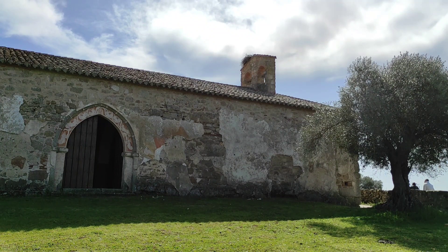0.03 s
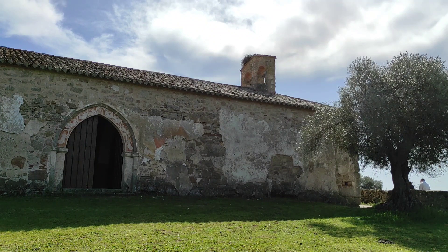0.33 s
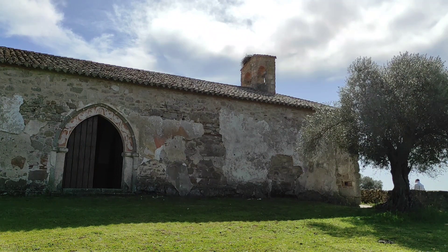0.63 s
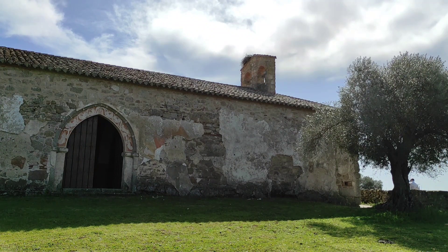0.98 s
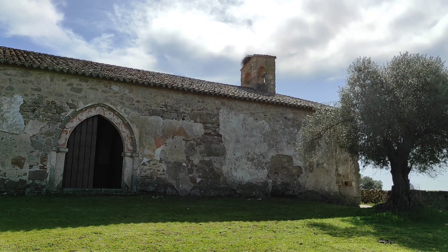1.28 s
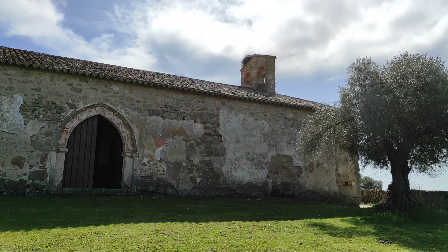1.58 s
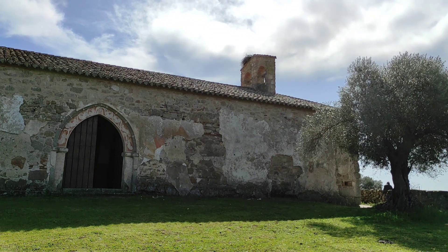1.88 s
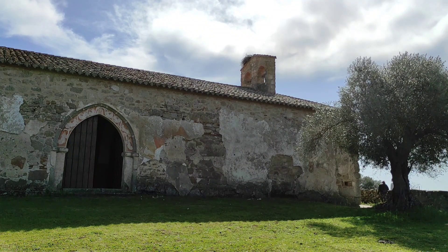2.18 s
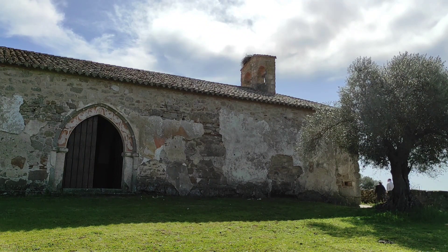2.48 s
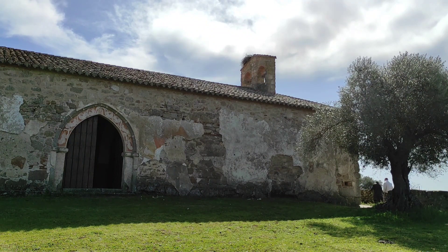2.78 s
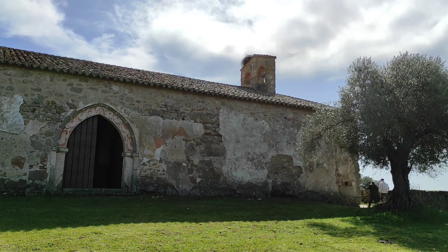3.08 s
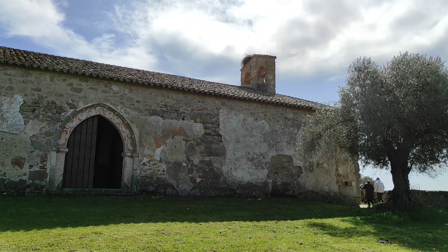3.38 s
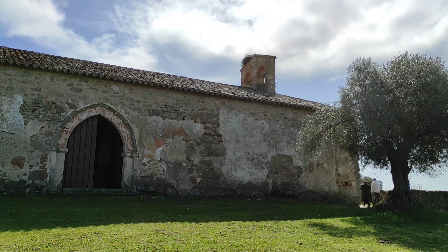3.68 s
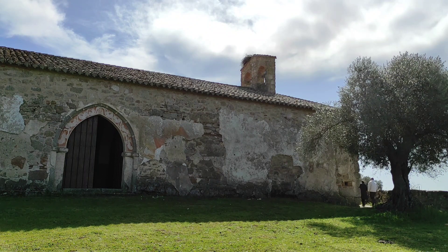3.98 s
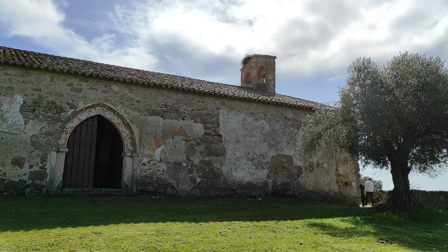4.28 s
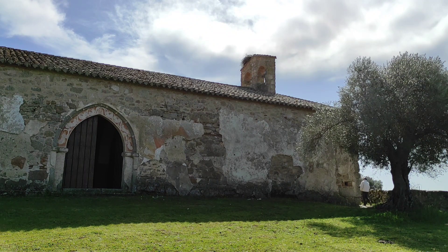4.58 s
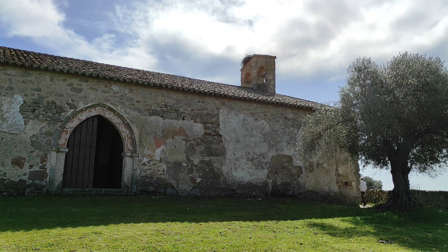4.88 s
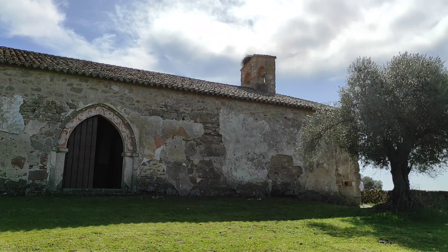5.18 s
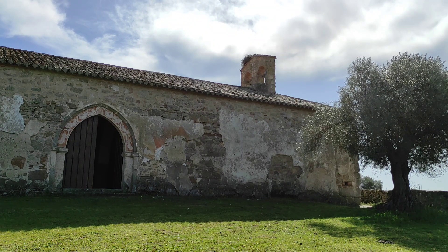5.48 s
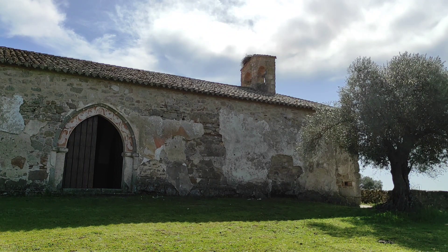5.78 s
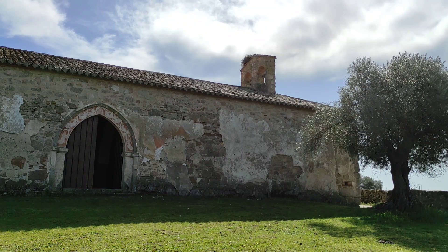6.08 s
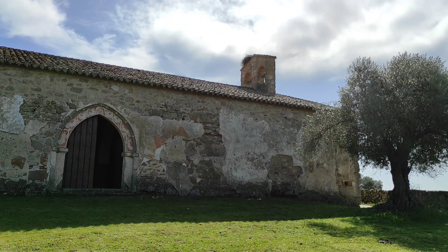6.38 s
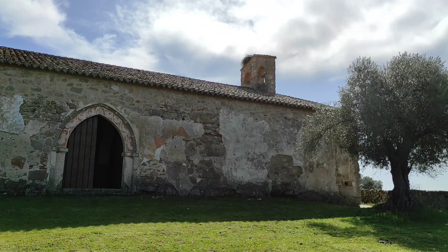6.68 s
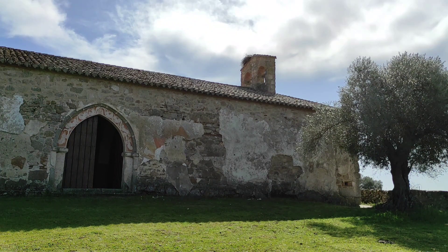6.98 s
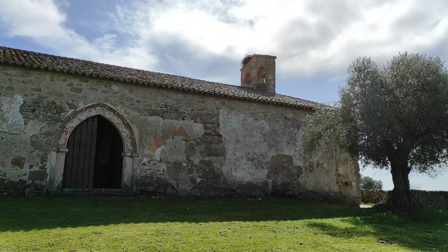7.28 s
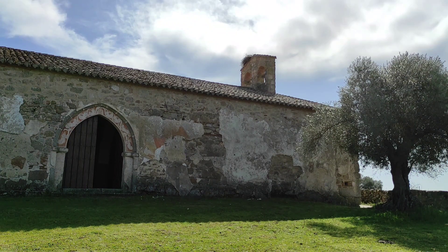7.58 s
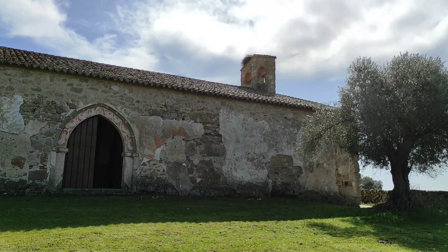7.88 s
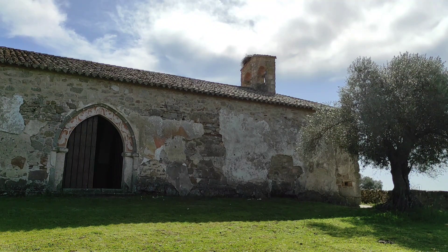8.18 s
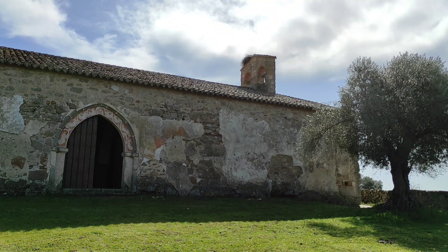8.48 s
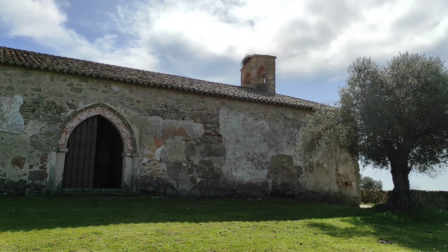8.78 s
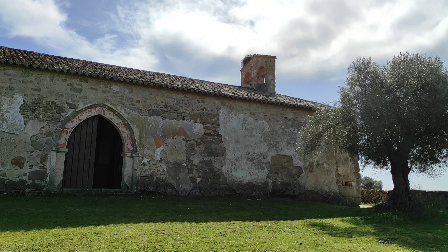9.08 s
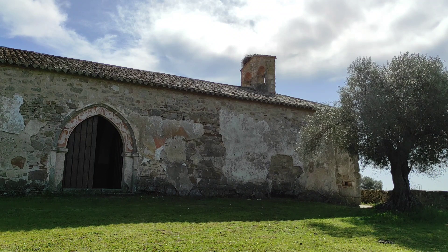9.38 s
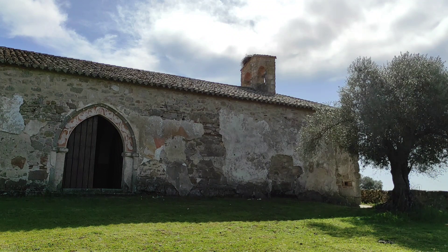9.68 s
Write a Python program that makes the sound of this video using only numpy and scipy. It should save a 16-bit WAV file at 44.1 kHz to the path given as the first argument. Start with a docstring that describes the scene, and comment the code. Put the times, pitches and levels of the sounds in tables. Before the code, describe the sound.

Outdoors in the countryside, one small bell is turned over and over by hand, clanging about three times a second in soft and hard pairs whose tones ring into each other. Stone walls answer briefly and the axle groans faintly. Wind buffets the microphone at first and then settles to a low rumble with a gentle hiss of leaves. Late on, a distant cow gives one faint low while the bell keeps ringing.

```python
"""A small bronze bell in a stone gable, turned over and over by hand, is already pealing as heard from the lawn.
Its clapper falls twice a turn, softly on one lip, then hard and bright on the other, exciting modes that
decay in a fast even peal; the axle groans faintly around each soft blow and the walls answer.
Wind buffets the microphone, with sharp puffs in the first 2.3 s, then eases over a wash of air and leaves.
From 8.4 s a cow lows far away while the bell rings on."""
import sys
import numpy as np
from scipy import signal
from scipy.fft import rfft, irfft, next_fast_len
from scipy.io import wavfile
from scipy.ndimage import map_coordinates

SR = 44100
rng = np.random.default_rng(int(sys.argv[2]) if len(sys.argv) > 2 else 0)


def pcm_store(signal):
    """Save signal as 16-bit PCM."""
    levels = np.round(np.clip(np.atleast_2d(signal), -1, 1) * 32767)
    wavfile.write(sys.argv[1], SR, levels.astype(np.int16).T)


N = 433944

# Clapper blows, soft lip and hard lip in turn; the hum gains or loses by how a blow meets the
# old ringing: (time [s], force [dB], hum gain [dB])
BLOWS = [(-0.17, 0, -1), (0.1225, -0.5, -3.5), (0.549, 2.5, -2), (0.8838, 1, -1.5), (1.2983, -2.5, -9),
         (1.623, 1.5, -.5), (2.027, 0, -4), (2.3171, -0.8, -6.5), (2.7422, 1, -4.5), (3.0359, -1, -6.5),
         (3.4435, 1.5, -2.6), (3.7586, 1, -5), (4.1756, 0.9, -3.5), (4.476, 0.2, -1.5), (4.8939, 1, -4.5),
         (5.1845, -2.5, -4), (5.6167, -0.3, -2), (5.9063, -2.3, -6.5), (6.3196, 0.9, -9.5),
         (6.64, -2.1, -1.5), (7.079, 0.5, -1), (7.3673, 0.4, -4), (7.787, -0.1, -3.5), (8.0688, -3, -3),
         (8.4794, 3.5, 1), (8.8003, 1, 6.5), (9.2082, -4.5, 6), (9.5045, -1.4, 0.5)]
BLOW_TIMES = [row[0] for row in BLOWS] + [9.93]  # the last entry is the next soft blow: it closes the final turn, and the axle groans just before it


def bell(hum_hz=977.2, hard_clang_db=-39.5, soft_clang_db=-45.0, clang_t60=0.31,
         crack_db=8, crack_t60=0.064, rebound_db=-2.0, rebound_rise_s=.012, rebound_t60=0.096,
         hard_rise_s=0.0002, soft_rise_s=0.0017, damp_s=0.005):
    """Impact excitation: each blow damps the old ringing and starts new modes, a crack and a clang."""
    # A stronger blow is brighter: (frequency [Hz], gain at 0 dB force [dB], growth with force [dB/dB])
    brightening = [(1400, -0.9, 0.69), (2200, -1.22, 0.63), (3300, -1, 0.78), (3900, 0.7, 1.05),
                   (4800, -1.6, 1.86), (5500, 0.5, 1.84), (7700, 2.94, 1.08), (10200, 3, 1.2)]
    # Slow drift of the treble above about 5 kHz: (time [s], gain [dB])
    sparkle = [(.9, 1.5), (1.6, -0.9), (3, 1.8), (5.2, -0.2), (7, -1), (9.5, 1)]
    clang = clang_noise()
    turns = (np.arange(len(BLOW_TIMES)) - 1) / 2
    out = np.zeros(N)
    for k, (s, force_db, hum_db) in enumerate(BLOWS):
        hard, length = k % 2, BLOW_TIMES[k + 1] - s
        t = np.arange(int((length + .06) * SR)) / SR
        turn = np.interp(s + t, BLOW_TIMES, turns)
        sparkle_db = np.interp(s, *np.transpose(sparkle))
        colour = [(hum_hz, hum_db)]
        for hz, db, growth in brightening:
            colour.append((hz, db + growth * force_db + sparkle_db * (hz > 5000)))
        fade = amp(-60 * t / clang_t60) + amp(crack_db - 60 * t / crack_t60)
        if hard:  # the clapper bounces back once
            since = t - rng.uniform(.085, .125)
            rise = np.clip(since / rebound_rise_s, 0, 1)
            fade += rise * amp(rebound_db - 60 * abs(since) / rebound_t60)
        dense = np.roll(clang, -k * SR // 3)[:len(t)] * fade
        clang_db = force_db + (hard_clang_db if hard else soft_clang_db)
        blow = ringing_modes(t, turn, hard, colour) + amp(clang_db) * dense
        contact = 1 - np.exp(-t / (hard_rise_s if hard else soft_rise_s))
        damping = np.exp(-np.maximum(t - length, 0) / damp_s)
        add(out, s, gable(blow * contact * damping))
    return out + clapper_grazes(clang, clang_t60)


def ringing_modes(t, turn, hard, colour, swing_m=0.034, rise_cycles=6, bite_share=0.77, bite_s=0.029):
    """Modal superposition: damped sinusoids of a turning bell, weighted by colour (Hz, dB)."""
    # Main modes: (frequency [Hz], hard-lip level [dB], soft-lip level [dB], decay by 60 dB [s],
    # radiation lobes [count], lobe depth [0-1], lobe direction [turns])
    main_modes = [(977.2, -39, -43, 1.62, 2, .45, .32), (1408, -43, -50.5, 2.2, 1, .62, .66),
                  (1515.5, -48, -45.8, 1.6, 2, .58, .45), (2225.6, -42.3, -39.5, 1, 3, .65, .057),
                  (2826.3, -42.8, -37, .88, 1, .8, .34), (2873, -32.8, -43.9, .52, 2, .62, .435),
                  (3234.5, -38.3, -36.7, .66, 2, .45, .033), (4504.5, -30.2, -39.5, .45, 1, .65, .69)]
    # Upper modes: (frequency [Hz], hard-lip level [dB], soft-lip level [dB], base decay by 60 dB [s])
    upper_modes = [(3944, -51, -51.5, .62), (3966, -49, -59.5, .7), (4165, -50, -50, .55),
                   (4627, -40, -43, .4), (4698, -39, -51, .42), (5581, -54, -59, .55),
                   (5720, -53, -52, .51), (5985, -33.6, -38.6, .45), (6428, -46.3, -41, .49),
                   (6483, -34.6, -40.3, .4), (6555, -41.4, -39.2, .44), (6735, -48.5, -46.5, .6),
                   (6803, -49.3, -56.6, .49), (7500, -43.8, -45.1, .41), (7644, -39, -40.3, .54),
                   (7942, -50, -44, .47), (8004, -50, -52, .52), (8490, -51, -55, .44),
                   (8663, -50, -57, .45), (9242, -48, -62, .36), (9515, -53, -57, .49),
                   (9625, -54.5, -65, .39), (9981, -57, -80, .3), (10505, -58, -73, .43),
                   (11518, -69, -75, .45), (12976, -64, -82, .33), (13615, -66, -75, .36)]
    delayed_t = np.float32(t - swing_m / 343 * np.sin(2 * np.pi * turn))  # Doppler: the mouth circles
    t, turn = np.float32(t), np.float32(turn)
    build_up = .68 * (1 - np.exp(-t / .06))
    bite = 1 + bite_share * np.exp(-t / bite_s)  # a hard blow first sheds its treble quickly
    out = np.zeros(len(t))
    for hz, hard_db, soft_db, t60, *lobes in main_modes + upper_modes:
        db = (hard_db if hard else soft_db) + along(colour, hz)
        phase = 2 * np.pi * (hz * delayed_t + rng.random())
        # reflections of the moving bell build up slightly detuned and beat with the direct sound
        beat_hz = hz ** .5 / 7 * rng.uniform(.6, 1.4) * (1 if rng.random() < .5 else -1)
        reflected = build_up * min(1, hz / 1800)
        wave = np.sin(phase) + reflected * np.sin(phase + 2 * np.pi * (beat_hz * t + rng.random()))
        if lobes:  # louder and quieter directions sweep past the listener
            count, depth, direction = lobes
            wave += depth * np.sin(phase + 2 * np.pi * count * (turn - direction))
            db -= 0.05 * rng.normal()
        else:  # upper modes vary more from blow to blow
            db += rng.normal(-2, 2.0)
            t60 *= 0.89
        swell = 1 - np.exp(-t * hz / rise_cycles)  # low modes build up more slowly
        if hard and hz > 3000:
            swell = swell * bite
        decay = np.exp(-float(np.log(1000) / t60) * t)
        out += decay * swell * wave * float(amp(db))
    return out


def clang_noise(band_hz=22, peak_db=20, peak_share=.13):
    """High modal density: crowded weak overtones merge into noise with narrow spectral peaks."""
    # Spectral envelope of the clang: (frequency [Hz], relative density [dB])
    envelope = [(200, -19.5), (700, -19.5), (1500, -8.5), (1900, -13), (3000, 2.5), (3750, -4), (4500, 8),
                (5150, -6), (6400, -3), (7800, 2), (9600, -12.5), (11000, -24.5), (13500, -49),
                (15000, -33)]
    grid = np.arange(0, SR / 2, band_hz)
    peaks = peak_db * (rng.random(len(grid)) < peak_share)
    white = rng.standard_normal(N)
    return unit(filtered(white, lambda hz: amp(along(envelope, hz) + np.interp(hz, grid, peaks))))


def clapper_grazes(clang, clang_t60, clang_db=-34, start_db=-19.5, fade_db_per_s=1.3, rise_s=0.0041):
    """Light contact excites mostly treble: the clapper grazes the bronze just before each hard blow."""
    t = np.arange(SR // 6) / SR
    touch = ringing_modes(t, turn=0 * t, hard=True, colour=[(1500, -29.5), (4500, -5.0), (9000, 5.0)])
    envelope = (1 - np.exp(-t / rise_s)) * (1 - t / t[-1])
    out = np.zeros(N)
    for s in BLOW_TIMES[1::2]:
        dense = amp(clang_db - 60 * t / clang_t60) * np.roll(clang, rng.integers(N))[:len(t)]
        lead_s = rng.normal(.06, 0.0052)
        db = rng.normal(start_db - fade_db_per_s * s, 4)  # lighter as the ringer settles in
        add(out, s - lead_s, amp(db) * (dense + touch) * envelope)
    return out


def gable(sound, gap_s=.005):
    """Scattering: the gable adds a delayed answer, different for each position of the bell."""
    response = np.pad(wall_tail(), (round(gap_s * SR), 0))
    response[0] += 1  # the direct path
    return signal.fftconvolve(sound, response)


def yard(x, step_s=.7):
    """Diffuse field: reverberation, unrelated at the two ports, changes as bell and air move."""
    step = round(step_s * SR)
    padded = np.pad(x, (step, 2 * step))
    crossfade = np.sin(np.linspace(0, np.pi, 2 * step))
    out = np.zeros((2, N))
    for start in range(0, N + step, step):
        segment = padded[start:start + 2 * step] * crossfade
        for port in out:
            add(port, (start - step) / SR, signal.fftconvolve(segment, wall_tail()))
    return out


def wall_tail():
    """Reverberant decay: a random impulse response of stone walls, each band dying at its own rate."""
    # Reverberation time: (frequency [Hz], decay by 60 dB [s])
    decay_times = [(500, 0.73), (3000, 0.3), (7000, 0.76), (14000, 0.12)]
    # Strength of the reflected sound: (frequency [Hz], gain [dB])
    reflection = [(1000, -3.5), (3000, -15), (5000, -18.5), (8000, -19.5)]
    hz, t, spectra = signal.stft(rng.standard_normal(SR // 2), SR, nperseg=256)
    t60 = along(decay_times, hz)[:, None]
    equal_energy = np.sqrt(np.log(10 ** 6) / (t60 * SR))
    gain = amp(along(reflection, hz))[:, None] * equal_energy
    return signal.istft(spectra * gain * amp(-60 * t / t60), SR, nperseg=256)[1]


def at_ports(x):
    """Diffraction: the housing shades and delays the two microphone ports differently by frequency."""
    # Left port relative to right: (frequency [Hz], level difference [dB], phase lead [rad])
    shading = [(900, 10.7, 0), (1000, 10.7, 0), (1400, 5.3, 0), (2300, 5.1, 0), (3200, 3.7, .2),
               (4500, 2.7, .4), (6000, .1, 1), (6750, -1.4, 1.2), (7600, 3.7, 2.4), (8000, 10.9, 2.3),
               (8600, 9.6, 1.5), (10500, 8.1, 1.4), (13500, 1.1, 2.3)]

    def response(hz):
        half = amp(along(shading, hz) / 2) * np.exp(.5j * along(shading, hz, column=2))
        pair = np.array([half, 1 / half])
        return pair / np.sqrt(np.mean(abs(pair) ** 2, axis=0))
    return filtered(x, response)


def wind(left_db=8.5, right_db=-5.0, lumps_db=2.0, puff_gain_db=3):
    """Turbulent pressure: eddies rumble on each port separately, most on the windward left one."""
    # Strength of the buffeting: (time [s], relative level [dB])
    buffeting = [(0.0, -60), (0.05, -56), (0.13, -59.5), (0.38, -52), (1.2, -57), (1.31, -62), (2.3, -56),
                 (2.38, -66), (2.52, -57), (2.6, -64.5), (5.59, -64.5), (5.78, -54), (5.84, -61),
                 (8.17, -63), (8.25, -68.5), (9.84, -63.5)]
    # Sharp puffs on the ports: (time [s], half length [s], relative level [dB])
    puffs = [(0.067, 0.021, -57.5), (0.33, 0.017, -60), (0.453, 0.021, -51), (0.608, 0.039, -53),
             (0.746, 0.069, -60), (0.947, 0.016, -52), (1.092, 0.042, -53.5), (2.245, 0.043, -62)]
    # Spectra of the rumble and of a puff: (frequency [Hz], relative density [dB])
    rumble_spectrum = [(15, -0.5), (32, 2.5), (60, -6.5), (110, -15.5), (200, -20), (500, -39.5),
                       (2000, -77)]
    puff_spectrum = [(25, 6.5), (60, 12), (170, 9), (280, -5.5), (500, -20.5), (2000, -54.5)]
    buffet_db, = curves(buffeting)
    t = np.arange(N) / SR
    rumble = amp(buffet_db) * unit(noise(rumble_spectrum) * amp(lumps_db * wobble(12)))
    puffing = sum(amp(db + puff_gain_db) * np.exp(-((t - s) / width) ** 2) for s, width, db in puffs)
    return (rumble + puffing * noise(puff_spectrum)) * amp([[left_db], [right_db]])


def axle(pitch_hz=500, arch_hz=18, blur=1.0):
    """Friction tones: the bearing groans in nearly pure arched notes, blurred by the distance."""
    # The axle binds at the same two places in every turn:
    # (centre time after the soft blow [s], length [s], relative level [dB])
    groans = [(-.11, 0.14, -74.5), (.095, .13, -70)]
    # How strongly it binds: (time [s], gain [dB])
    binding = [(.5, 4), (1.4, 5), (2.1, -7), (5, -5.5), (6.4, -4), (9.8, 2)]
    binding_db, = curves(binding)
    out = np.zeros(N)
    for s in BLOW_TIMES[::2]:
        for after_s, length, db in groans:
            arch = np.sin(np.linspace(0, np.pi, int(length * SR)))
            phase = 2 * np.pi * np.cumsum(pitch_hz + arch_hz * arch) / SR
            add(out, s + after_s - length / 2, amp(db) * arch * np.sin(phase))
    return out * amp(binding_db) * np.sqrt(2) * (1 + blur * wobble(42))


def cow(waver=0.0034, flutter_db=1):
    """Attenuation with distance: of one long low, only the fundamental carries this far."""
    # Course of the call: (time [s], pitch [Hz], relative level [dB])
    call = [(8.4, 274, -100), (8.52, 300, -73), (8.6, 323, -71), (8.8, 334, -65.5), (9.1, 339, -68),
            (9.42, 342, -64), (9.5, 332, -69), (9.57, 302, -100)]
    hz, db = curves(call)
    phase = 2 * np.pi * np.cumsum(hz * (1 + waver * wobble(18))) / SR
    voiced = db > db.min()
    return np.sqrt(2) * amp(db + flutter_db * wobble(8.6)) * np.sin(phase) * voiced


def countryside(left_db=-65, right_db=-74, patchy_db=1):
    """Partly coherent ambient noise: a soft wash of air and leaves, half shared by the two ports."""
    # Spectrum of the wash: (frequency [Hz], relative density [dB])
    air_spectrum = [(25, -41), (110, -9.5), (200, 6), (300, 0), (500, -0.5), (800, -3.5), (2000, -13),
                    (5000, -20.5), (9000, -21.5), (12000, -47.5), (15000, -43)]
    shared, left, right = noise(air_spectrum, channels=3)
    wash = unit(np.array([left + shared, right + shared]))
    return wash * amp(patchy_db * wobble(2.91)) * amp([[left_db], [right_db]])


def amp(db):
    """Decibels as an amplitude ratio."""
    return 10 ** (np.asarray(db) / 20)


def unit(x):
    """Normalisation to rms 1."""
    return x / np.sqrt(np.mean(x ** 2) + 1e-20)


def along(points, hz, column=1):
    """Interpolation of a table column on a log frequency axis."""
    table = np.transpose(points)
    return np.interp(np.log(hz + 1), np.log(table[0]), table[column])


def curves(rows):
    """Linear interpolation: one value per sample for each column after the time."""
    s, *cols = np.transpose(rows)
    return [np.interp(np.arange(N) / SR, s, c) for c in cols]


def wobble(rate):
    """Random modulation: a smooth curve with rate knots a second."""
    return map_coordinates(rng.standard_normal(int(N * rate / SR) + 4), [np.arange(N) * rate / SR])


def filtered(x, response):
    """Linear filtering: the spectrum of x times a complex frequency response."""
    m = next_fast_len(N + 8192)
    return irfft(rfft(x, m) * response(np.fft.rfftfreq(m, 1 / SR)), m)[..., :N]


def noise(spectrum, channels=2):
    """Spectral shaping: uncorrelated coloured noises of rms 1."""
    return unit(filtered(rng.standard_normal((channels, N)), lambda hz: amp(along(spectrum, hz))))


def add(track, s, sound):
    """Superposition of a sound on a track from time s on."""
    start = round(s * SR)
    sound = sound[max(-start, 0):max(N - start, 0)]
    track[max(start, 0):][:len(sound)] += sound


def scene(yard_db=-4):
    """Superposition at two ports: the bell, its reverberation, wind, leaves, axle and far cow."""
    peal = bell()
    leftward = amp([[3.5], [-6]])
    bell_in_yard = at_ports(peal) + amp(yard_db) * yard(peal)
    return bell_in_yard + wind() + countryside() + (axle() + cow()) * leftward


def record(dry, top_hz=14600):
    """Band limiting: an ideal low-pass filter passes nothing above top_hz."""
    return filtered(dry, lambda hz: hz < top_hz)


dry = scene()
out = record(dry)
pcm_store(out)
```